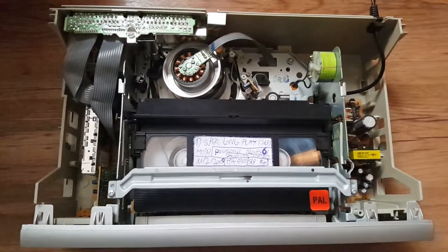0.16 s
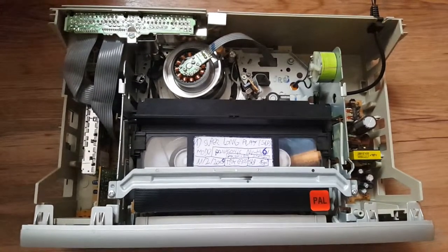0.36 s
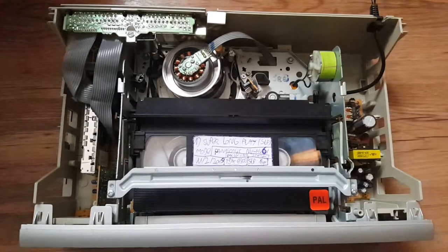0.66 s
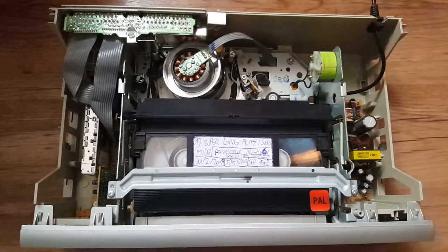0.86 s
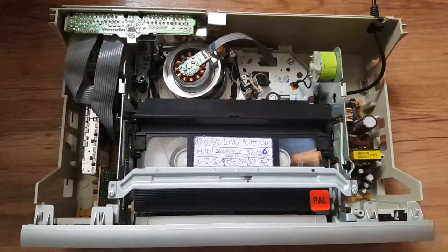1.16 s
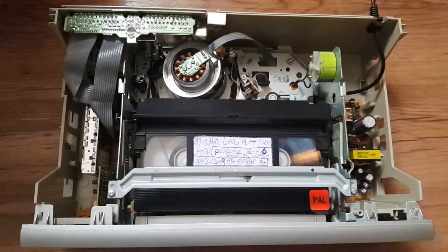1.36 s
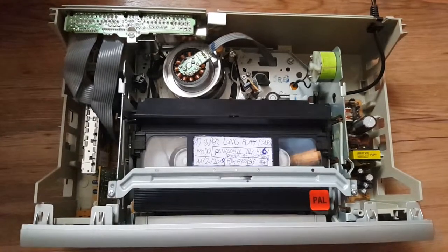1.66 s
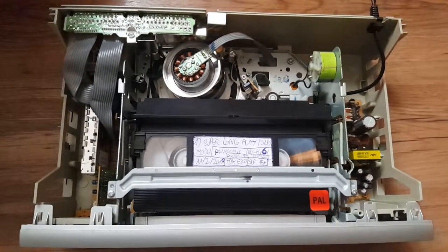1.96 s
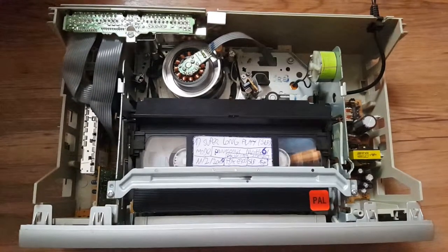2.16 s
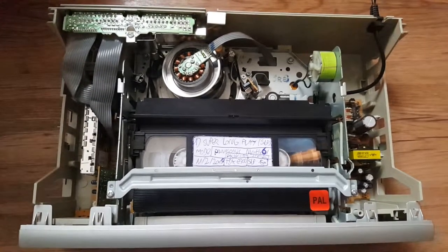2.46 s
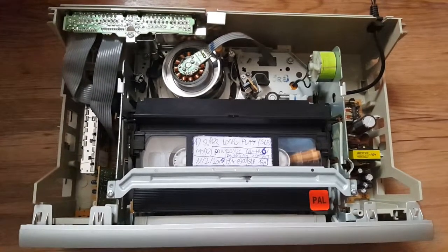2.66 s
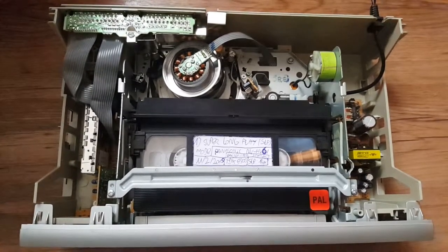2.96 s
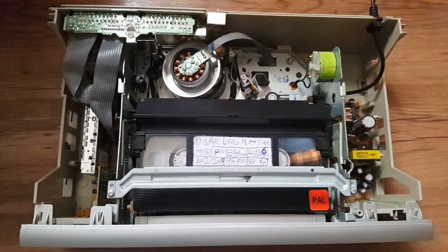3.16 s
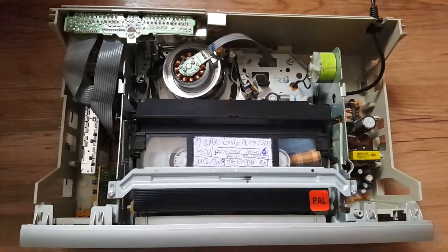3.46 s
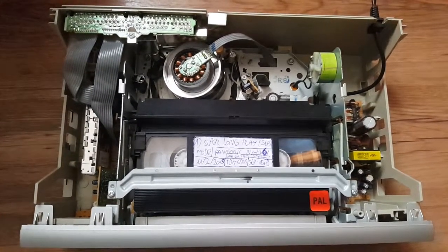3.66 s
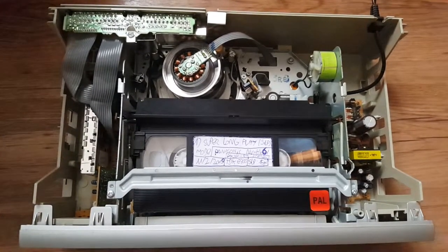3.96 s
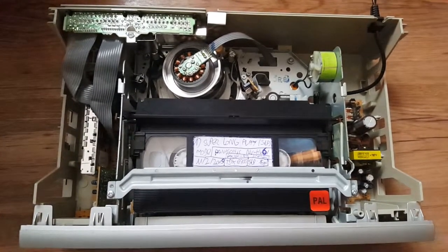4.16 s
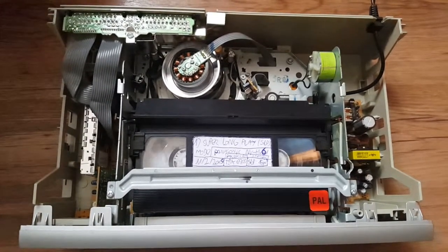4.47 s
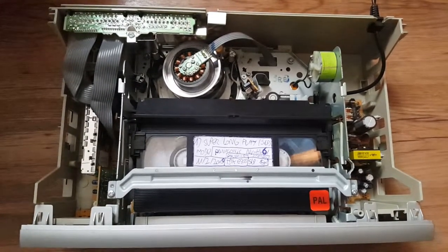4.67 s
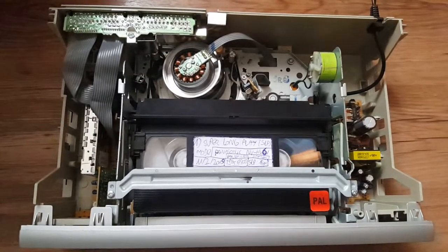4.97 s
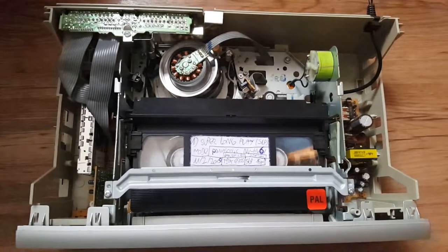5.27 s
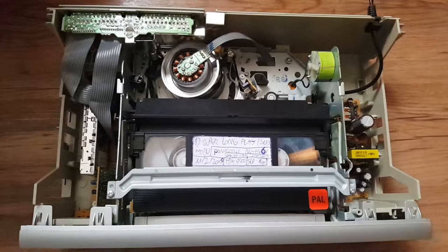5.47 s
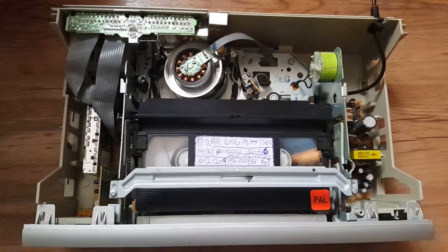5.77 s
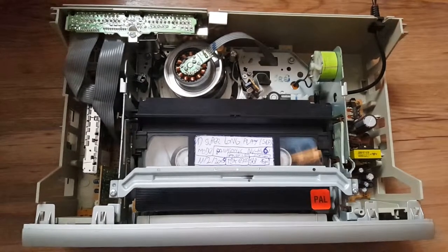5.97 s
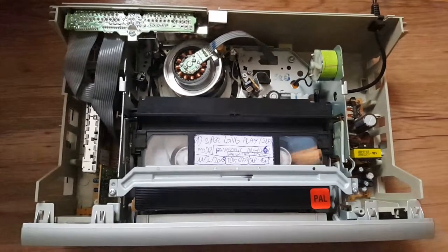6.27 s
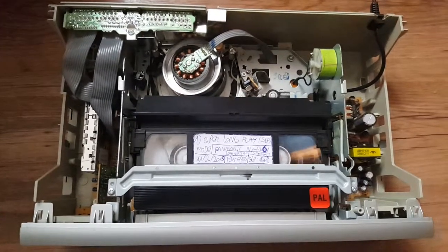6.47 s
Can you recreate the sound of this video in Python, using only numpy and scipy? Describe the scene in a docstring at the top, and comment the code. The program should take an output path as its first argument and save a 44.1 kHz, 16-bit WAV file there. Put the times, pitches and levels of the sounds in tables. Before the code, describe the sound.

An open video cassette recorder winds a tape at speed, gears rattling and whining slightly downward while the reels give brief high chirps. It brakes with a cluster of plastic and metal clacks, leaving a faint hum. A small motor whirs in short runs, a lever snaps over, and the tape winds on with a quieter, fluttering purr and light scrapes. Heard close up in a quiet room.

```python
"""A whining, chattering rush of tape: an open video recorder on a wooden table winds a cassette fast.
Reel flanges chirp against the shell, the gears run down and the brakes bite with a few clicks.
The small loading motor shifts the mechanism in short runs, a lever snaps over, and the tape winds on
slowly with a purr. Head drum and mains transformer hum throughout. Rattle, scrapes and clatter all
ring through the same chassis."""
import sys
import numpy as np
from scipy import signal
from scipy.fft import rfft, irfft
from scipy.io import wavfile
from scipy.ndimage import uniform_filter1d

SR = 44100
rng = np.random.default_rng(int(sys.argv[2]) if len(sys.argv) > 2 else 0)


def put_to_file(sound):
    """Save the sound as 16-bit audio at rate SR, in the file named by the first command-line argument."""
    columns = np.atleast_2d(sound).T  # one column per channel
    safe = np.clip(columns, -1, 1)
    whole_steps = np.round(safe * 32767)
    wavfile.write(sys.argv[1], SR, whole_steps.astype(np.int16))


N = 292065
T, HZ = np.arange(N) / SR, np.fft.rfftfreq(N, 1 / SR)

# resonances of deck plate and case (frequency [Hz], width [Hz], lift [dB])
CHASSIS_MODES = [(125.4, 10.6, 8), (234, 28, 8), (326, 49, 11.5), (402, 53, 8.5), (478, 36, -3),
                 (531, 84, 14), (583, 25, -2.5), (642.3, 120, 16), (711, 16.4, 9.5), (757, 27, 8),
                 (830, 30, -2.5), (867, 16, 9.5), (920, 137, 6.5), (1060, 590, 2.5), (1307, 26, 1.5),
                 (1470, 150, 4), (1817, 200, 5), (2273, 290, 3), (2646, 82, 3.5), (3015, 140, 6.5),
                 (3270, 60, 3.5), (5200, 2230, 7), (6000, 64, 1), (7870, 650, 7)]
# narrow wheel resonances that the whine slides through (frequency [Hz], width [Hz], lift [dB])
WHEEL_MODES = [(330, 7.3, -0.5), (527, 4.9, -1.5), (701, 49, 4.5), (895, 9.5, 9.5), (918, 18, 2.5),
               (1067, 71, 8), (1153, 15, 11)]
# gear whine (pitch [x mesh rate], blur [Hz], early level [dB], late level [dB], beating twin [dB])
WHINE_TONES = [(.635, 4, -21.5, -13.5, -8), (1, 3, -14, -10.5, -9), (1.265, 9, -16, -18, -8),
               (1.63, 5, -18, -19, -6), (2, 2, -20.5, -14.5, -4), (2.48, 3, -19, -18.5, -6),
               (2.7, 6, -20, -22, -6), (3, 4, -23, -20.5, -6)]
# regular pulses in the reels' rubbing hiss, one slow and two faster
# (rate [Hz], first peak [s], depth [nepers])
RUB_PULSES = [(5.9, .162, .18), (13.06, .059, .45), (26.6, .01, .5)]
# strongest lines of drum motor and transformer (frequency [Hz], level [dB])
HUM_LINES = [(1001, -75), (1050, -75), (1104, -63.8), (1211, -73), (1249, -68), (1297, -71), (1324, -64),
             (1416, -70), (1432, -66), (1502, -73), (1588, -75), (1620, -73), (1653, -64), (1685, -70),
             (1760, -74), (1857, -68), (1873, -69), (2051, -80), (2202, -76), (2250, -79), (2299, -73),
             (2401, -72), (3020, -83), (3106, -81), (3429, -86), (3650, -79)]
# shifts in the hum's colour (time [s], gain up to 1.1 kHz [dB], gain from 1.8 kHz up [dB])
HUM_SHIFTS = [(2.55, 2.5, -6), (2.78, 4, 0.5), (2.95, -1.5, 2), (3.28, 2.5, 1.5), (3.55, -2.5, 1),
              (4.2, -0.5, -1), (4.5, 2.5, -1)]
# a flange touches the cassette shell (time [s], level [dB], length [s])
SCRAPES = [(0.165, -43, 0.012), (0.343, -42, 0.015), (0.425, -44, 0.013), (0.983, -44, 0.0074),
           (1.533, -43, .009), (1.758, -43.5, 0.011), (1.925, -51, 0.012), (2.049, -42, 0.011),
           (2.271, -52.5, 0.012), (4.528, -51.5, 0.035), (4.581, -52, 0.0073), (4.888, -53.5, 0.08),
           (5.006, -53, 0.026), (5.155, -59, 0.025), (5.358, -61.5, 0.022), (5.42, -61, 0.021),
           (5.506, -56, 0.034), (5.63, -62, .02), (5.685, -60, 0.026), (5.837, -57, 0.046),
           (5.912, -55.5, 0.024), (6.053, -56, 0.041), (6.277, -56.5, 0.03), (6.36, -56.5, 0.023),
           (6.42, -59, 0.049), (6.597, -60, .02)]
# loading motor runs (start [s], stop [s], coasting [s], gear level [dB], brush level [dB])
LOADING_RUNS = [(2.094, 2.145, 0.07, -60, -50), (3.705, 4.069, 0.021, -59.5, -66),
                (4.268, 4.389, 0.031, -59.5, -65)]
# blows of brakes, pawls and levers; the last five columns are relative to the level
# (time [s], level [dB], clatter decay [s], knock [dB], bass [dB], clang [dB], treble [dB], snap [dB])
BLOWS = [(2.153, -35.5, 0.051, -12, 7.5, -4, -24, -30), (2.183, -44, .05, -8, -19, -6, -20, -14),
         (2.269, -39, 0.11, -14, -3, -31, -17, -29), (2.322, -43, .07, -10, 7, -12, -25, -21),
         (2.333, -35, 0.087, -14, -18, -15, -16, -29), (2.3497, -32, 0.058, -2, -7, -4, 1.5, -9),
         (2.38, -46, .02, -1, -4, -12, -12, -20), (2.448, -42, 0.14, -20, -21, -32, -30, -35),
         (2.466, -41.5, 0.039, -3, -20, 1, -19, -30), (2.472, -40.5, .025, -4, -20, -4.5, -22, -35),
         (2.511, -60, .04, -12, -15, -6, 6, -20), (2.517, -42.5, .025, -2, -1, -18, -13, -30),
         (3.714, -58, .067, -14, 6, -22, -22, -30), (3.759, -45, .067, -14, 0, -20, -22, -30),
         (3.879, -37, .04, -10, -10, -18, -25, -30), (4.6068, -39.5, .05, -12, -20, -11, -1, 7),
         (4.608, -30.5, 0.034, -3, -4.5, -18, -8, -16), (4.659, -54.5, .05, -8, -22, -22, 5, -29),
         (4.682, -57, .05, -8, -14, -19, 9, -28)]
# ring of a struck lever (frequency [Hz], level [dB], time to fall 60 dB [s])
LEVER_MODES = [(870, -7, .012), (1400, -8, .003), (1739, -17, .05), (2300, -9, .002), (3070, -11, .06),
               (3375, -19, .06), (3935, -16, .053), (4620, -19, .05), (5700, -12, .003), (7230, -21, .05)]
# the lever bounces (delay [s], level [dB])
REBOUNDS = [(.003, -4), (.0045, -8), (.008, -11)]
# gear tones of the slow drive (frequency [Hz], blur [Hz], level [dB])
PURR_TONES = [(125.5, 2, -21.5), (203, 4, -21), (251, 5, -16.5), (381, 7, -12.5), (522, 18, -11.5),
              (650, 7, -14), (755, 9, -16), (877, 7, -11.5), (1890, 5, -9), (2210, 8, -19), (2620, 2.5, -9),
              (3050, 8, -18), (3290, 4.5, -23)]

# tone colour of each source (frequency [Hz], relative level [dB])
FAST_RATTLE_EQ = [(30, -19), (60, -33), (110, -17.5), (180, -15), (300, -9), (600, -14.5), (1000, -2),
                  (1700, -0.5), (2400, -6.5), (3600, -13), (4500, -13), (5400, -17.5), (6500, -17.5),
                  (8500, -15), (10500, -26), (13500, -21.5), (15500, -32)]
FLANGE_EQ = [(30, -70), (3000, -45), (4600, 0), (5000, 10.5), (5300, 19), (5550, 12), (5900, 13.5),
             (6700, -4), (7900, 10), (9500, 0.5), (16000, -11)]
DRUM_EQ = [(180, -57), (300, -46), (568, -22), (680, -24), (828, -13.5), (1080, -23), (1290, -23),
           (1520, -5.5), (1880, -14), (1970, -15.5), (2320, -5.5), (2690, -16), (3730, -13.5),
           (5710, -29.5), (6600, -34), (7400, -23), (10000, -41), (15000, -41)]
TRANSFORMER_EQ = [(180, -50), (500, -30), (650, 8), (900, -32), (1500, 5), (1950, -8), (2330, -11),
                  (2600, -10), (3100, -1), (3350, -17), (3680, -3), (4200, -29), (4650, -3.5), (5050, -17),
                  (6300, -17), (7500, -14.5), (15000, -15.5)]
LOADING_GEAR_EQ = [(30, -19), (100, 3.5), (350, 5), (550, -7.5), (850, 4.5), (1250, 6.5), (1750, 10.5),
                   (2400, -1), (3600, -16), (7000, -39), (15000, -35)]
BRUSH_EQ = [(30, -50), (3000, -4.5), (4700, -9.5), (5300, -11.5), (6900, -9), (7700, -2.5), (8250, -8),
            (8650, 3.5), (8950, -4), (9900, -13), (11400, -7), (13300, -4), (13550, -3), (13950, -14),
            (16000, -12)]
SLOW_RATTLE_EQ = [(30, -53), (90, -19), (180, -1.5), (300, -4), (600, -9), (1000, 0.5), (1700, 1),
                  (2400, -1.5), (3600, -9.5), (6500, -17.5), (8500, -13.5), (10500, -20.5), (13500, -14),
                  (15500, -21)]
PULLEY_EQ = [(30, -64), (1200, -33), (1700, -13), (1880, 1), (2100, 2), (2630, -2), (2820, -6), (3050, 2),
             (3350, -15), (3800, -31), (16000, -40)]
ROOM_EQ = [(20, -18), (40, -8), (58, 5), (100, -5.5), (300, -9), (600, -10), (1200, -3), (3000, -37),
           (6000, -23), (15000, -38)]
CLATTER_EQ = [(30, -23), (300, 8.5), (1000, 6.5), (2300, 3), (4500, -3), (5400, -8.5), (8000, -7),
              (12000, -16), (16000, -13)]

# how alike the two microphone ports sound (frequency [Hz], correlation [-1 to 1])
PORT_LIKENESS = [(60, 0.6), (150, 0.9), (640, 0.78), (1400, 0.9), (3000, -0.13), (15000, 0.5)]
# how far the left port leads (frequency [Hz], phase [rad])
PORT_LEAD = [(100, .05), (700, 0.031), (950, 0.74), (1200, 1), (1500, 0.81), (1900, 0.83), (5000, 1.2),
             (9000, 2.4), (12000, 1.8), (15500, 8.2)]
# balance of the ports (frequency [Hz], left minus right [dB])
PORT_BALANCE = [(60, 1.5), (200, -1), (380, 3.5), (730, -2.5), (900, 2.5), (1080, -2), (1550, 3),
                (1850, 2.5), (2450, -1), (5100, -0.3), (8000, 0), (9200, 5), (11000, 2.5), (15000, 2.5)]

DRUM_HZ, MAINS_HZ = 18.37, 50


def gain_of(db):
    """Decibels as a gain."""
    return 10 ** (np.asarray(db) / 20)


def unit_rms(x):
    """Scales to unit rms."""
    return x / np.sqrt(np.mean(x ** 2) + 1e-20)


def curve(points, hz=HZ):
    """Joins a table's points along a log-frequency axis."""
    f, value = np.transpose(points)
    return np.interp(np.log(hz + 1), np.log(f + 1), value)


def lift(resonances):
    """Gain in dB of a set of resonances."""
    return sum(db / (1 + (2 * (HZ - hz) / width) ** 2) for hz, width, db in resonances)


def since(s):
    """Seconds gone by since s, zero before."""
    return np.maximum(T - s, 0)


def ramp(s, length_s):
    """Fades from 0 to 1, starting at s."""
    return np.minimum(since(s) / length_s, 1)


def wander(rate_hz):
    """Smooth random motion of unit rms, up to about rate_hz."""
    return unit_rms(irfft(rfft(rng.standard_normal(N)) * np.exp(-(HZ / rate_hz) ** 2), N))


def phase(hz):
    """Running angle of something turning at hz."""
    return 2 * np.pi * (np.cumsum(hz * np.ones(N)) / SR + rng.random())


def stereo_noise(pair, eq_db):
    """Colours two unrelated signals and blends them into what the two ports hear, at unit rms."""
    left, other = rfft(pair)
    likeness = np.clip(curve(PORT_LIKENESS), -1, 1)
    right = (likeness * left + np.sqrt(1 - likeness ** 2) * other) * np.exp(-1j * curve(PORT_LEAD))
    return unit_rms(irfft(np.array([left, right]) * gain_of(eq_db), N))


def stereo_tone(x, eq_db=0):
    """Colours one clear signal, which reaches the two ports out of step."""
    return irfft(rfft(x) * gain_of(eq_db) * np.exp(np.array([[.5j], [-.5j]]) * curve(PORT_LEAD)), N)


def hiss(eq_db, pressure=1):
    """Coloured friction noise that follows the contact pressure."""
    return stereo_noise(rng.standard_normal((2, N)) * pressure, eq_db)


def gear_tone(hz, blur_hz, flutter=.22):
    """A meshing tone whose uneven teeth blur its pitch and shake its level."""
    blur = .65 * wander(2 * blur_hz)
    return unit_rms(np.cos(phase(hz) + blur) * (1 + flutter * wander(4 * blur_hz)))


def chassis(grain_db=.8):
    """Body EQ in dB of deck plate and case: big resonances among countless small ones."""
    grain = uniform_filter1d(rng.standard_normal(len(HZ)), size=400)
    small_modes = unit_rms(uniform_filter1d(grain, size=300))
    crowding = np.clip(HZ / 2500, 0, 1)  # the small modes crowd in the treble
    return grain_db * crowding * small_modes + lift(CHASSIS_MODES)


def gear_whine(mesh_hz, teeth_per_pulley_turn=30.5):
    """Each gear tone beats with a twin one pulley rate below it and rings through the wheels."""
    whine = np.zeros(N)
    for multiple, blur_hz, early_db, late_db, twin_db in WHINE_TONES:
        level = gain_of(np.interp(T, [.47, 1.46], [early_db, late_db]))  # shifts as the load grows
        tone = gear_tone(multiple * mesh_hz, blur_hz)
        twin = gear_tone((multiple - 1 / teeth_per_pulley_turn) * mesh_hz, blur_hz)
        whine += level * (tone + gain_of(twin_db) * twin)
    return stereo_tone(whine, lift(WHEEL_MODES))


def fast_wind(body, start_hz=584, end_hz=508, sag_s=1.6, cut_s=2.05, run_down_s=.17, brake_s=2.138):
    """Gears chatter and whine, tape rushes and flanges rub until the motor cuts and the brake grips."""
    driven_hz = end_hz + (start_hz - end_hz) * np.exp(-T / sag_s)  # sags as the tape pack grows
    run_down = np.exp(-(since(cut_s) / run_down_s) ** 2)
    chatter = np.exp(.039 * wander(370) + .08 * wander(21))
    rattle = gain_of(-.4) * hiss(curve(FAST_RATTLE_EQ) + body, chatter)
    pulses = sum(depth * np.cos(2 * np.pi * hz * (T - first_s)) for hz, first_s, depth in RUB_PULSES)
    flange = gain_of(-15.3) * hiss(curve(FLANGE_EQ) + body, np.exp(pulses + .22 * wander(110)))
    whine = gain_of(1.2) * run_down ** 1.4 * gear_whine(driven_hz * np.maximum(run_down, .1))
    level = gain_of(-35 - 192 * since(brake_s))  # the brake takes off 192 dB a second
    return level * (rattle + flange + whine)


def buzz(cycle_hz, eq_db):
    """The same roughness comes round every cycle and makes a comb of lines."""
    cycle = rng.standard_normal((2, round(SR / cycle_hz)))
    return stereo_noise(cycle[:, np.arange(N) % cycle.shape[1]], eq_db)


def head_drum(bearing_db=-67, whirr_db=-64):
    """The spinning drum whirrs over the soft hiss of its bearing."""
    colour = curve(DRUM_EQ)
    return gain_of(bearing_db) * hiss(colour) + gain_of(whirr_db) * buzz(DRUM_HZ, colour)


def transformer(level_db=-66):
    """The transformer buzzes at multiples of the mains rate."""
    return gain_of(level_db) * buzz(MAINS_HZ, curve(TRANSFORMER_EQ))


def hum_lines(trim_db=-.8, swell_depth=.24, waver_depth=.17):
    """The strongest lines of drum motor and transformer sing out, swelling slowly and wavering fast."""
    drift = 1 + .00028 * wander(7.6)
    wobble = .14 * np.cos(phase(DRUM_HZ))  # the drum runs slightly out of true
    times, low_db, high_db = np.transpose(HUM_SHIFTS)
    low, high = gain_of(np.interp(T, times, low_db)), gain_of(np.interp(T, times, high_db))
    out = np.zeros((2, N))
    for hz, db in HUM_LINES:
        colour = low + np.interp(hz, [1100, 1800], [0, 1]) * (high - low)
        swell = 1 + swell_depth * np.cos(phase(rng.uniform(1, 3.5)))
        angle = phase(hz * drift)
        side = (-curve(PORT_LEAD, hz) / 2 + .4 * rng.standard_normal()) * np.sin(angle)
        line = np.sqrt(2) * (np.cos(angle) + np.array([side, -side]))  # out of step at the ports
        waver = 1 + waver_depth * wander(15) + wobble
        out += gain_of(db + trim_db) * colour * swell * waver * line
    return out


def flange_scrapes(body, slip_hz=107, slip_depth=.45, grain=.2):
    """Now and then a flange touches the shell, sticking and slipping in a short chirp."""
    touch_power = sum(gain_of(2 * db) * .5 ** np.minimum((2 * (T - s) / length_s) ** 2, 100)
                      for s, db, length_s in SCRAPES)
    slips = np.cos(phase(slip_hz * (1 + .1314 * wander(21.1))))
    pressure = np.exp(slip_depth * slips + grain * wander(150))
    return np.sqrt(touch_power) * hiss(curve(FLANGE_EQ) + body, pressure)


def loading_motor(body, spin_up_s=.049, worm_start_hz=1692, rise_hz_per_s=140, worm_db=-55.3):
    """A brush motor turns the cam by a worm gear: gears rattle at once, brushes hiss only at speed."""
    gears = gain_of(7.5) * hiss(curve(LOADING_GEAR_EQ) + body, np.exp(.22 * wander(150)))
    brushes = gain_of(9.5) * hiss(curve(BRUSH_EQ) + .47 * body, np.exp(.12 * wander(500)))
    out = np.zeros((2, N))
    for start, stop, coast_s, gear_db, brush_db in LOADING_RUNS:
        speed = (1 - np.exp(-since(start) / spin_up_s)) * np.exp(-since(stop) / coast_s)
        out += gain_of(gear_db) * speed ** .47 * gears
        out += gain_of(brush_db) * speed ** 1.45 * brushes
        loaded = start + .15  # the worm sings once the cam has taken up the load
        if loaded < stop:
            worm_hz = worm_start_hz + rise_hz_per_s * np.minimum(since(loaded), stop - loaded)
            worm = gear_tone(worm_hz, blur_hz=2.2)
            wheel = gain_of(-10) * gear_tone(.52 * worm_hz, blur_hz=8.3)
            out += gain_of(worm_db) * speed * ramp(loaded, .041) * (worm + wheel)
    return out


def lever_clicks(body, clatter_db=-8, attack_s=.00068, snap_speed=3.3, tail_db=-20, tail_t60=.5):
    """A hard knock rebounds, then plastic and steel clatter and die fast, with a faint room tail."""
    colour = curve(CLATTER_EQ) + body
    edges_hz = (60, 1000, 2800, 5000, 9500, 18000)  # bass, mid, clang, treble, snap
    bands = [hiss(colour - 10 * np.log10(1 + (lo / (HZ + 1)) ** 12 + (HZ / hi) ** 16))
             for lo, hi in zip(edges_hz, edges_hz[1:])]
    speeds = (1, 1, 1, np.sqrt(snap_speed), snap_speed)  # the top bands rise and die faster
    clatter, knocks = np.zeros((2, N)), np.zeros(N)
    for s, db, decay_s, knock_db, bass, clang, treble, snap in BLOWS:
        at = slice(round(s * SR), round(s * SR) + SR // 2)
        age = T[at] - T[at][0]
        shares_db = (bass + 3, 0, clang + 5, treble + 3, snap + 5)
        for band, share_db, speed in zip(bands, shares_db, speeds):
            t = speed * age
            attack = 1 - np.exp(-t / attack_s)
            decay = gain_of(-60 * t / decay_s) + gain_of(tail_db - 60 * t / tail_t60)
            clatter[:, at] += gain_of(db + clatter_db + share_db) * attack * decay * band[:, at]
        for hz, mode_db, t60 in LEVER_MODES:
            strike_db = db + knock_db + mode_db + shares_db[np.searchsorted(edges_hz, hz) - 1]
            knocks[at] += gain_of(strike_db - 60 * age / t60) * np.cos(2 * np.pi * hz * age)
    rebounds = sum(gain_of(db) * np.roll(knocks, round(delay_s * SR)) for delay_s, db in REBOUNDS)
    return clatter + stereo_tone(knocks + rebounds)


def slow_drive_envelope(jolt_s=4.53, attack_s=.024, decay_s=.13, start_s=4.662, growth_db_per_s=.44):
    """A jolt as the idler gear engages, then the reel gathers speed and slowly grows louder."""
    jolt = np.exp(-(np.minimum(T - jolt_s, 0) / attack_s) ** 2 - since(jolt_s) / decay_s)
    steady = ramp(start_s, .2) * gain_of(-50 + growth_db_per_s * since(start_s))
    return gain_of(-51.5) * jolt + steady


def slow_wind(body, reel_turn_s=.373, wow_depth=.008, swish_depth=.92):
    """Gears purr, wavering each reel turn; the pulley swishes once a turn and chops the high tones."""
    colour = curve(SLOW_RATTLE_EQ) + body
    rattle = gain_of(2.5) * hiss(colour, np.exp(.11 * wander(210)))
    pulley_hz = np.interp(T, [5.08, 5.27], [43.7, 46.3])
    wow = 1 + wow_depth * np.cos(2 * np.pi * (T - 5.48) / reel_turn_s)
    swish = unit_rms(1 + swish_depth * np.cos(phase(pulley_hz * wow)))
    pulley = gain_of(-11) * hiss(curve(PULLEY_EQ) + body, swish)
    purr = np.zeros(N)
    for hz, blur_hz, db in PURR_TONES:
        chop = swish ** min((hz / 1800) ** 1.9, 1)
        purr += gain_of(db) * gear_tone(hz * wow, blur_hz) * chop
    drive = slow_drive_envelope() * (rattle + ramp(4.8, .28) * (pulley + stereo_tone(purr)))
    # one gear sings out while the reel gathers speed
    rising_hz = np.interp(T, [4.75, 4.95, 5.2], [1760, 1845, 1885])
    spin_up = gain_of(-53.5) * np.exp(-((T - 5.04) / .19) ** 2) * gear_tone(rising_hz, 4.3) * swish
    # the low rattle swells briefly near the end
    low_rattle = hiss(colour - 10 * np.log10(1 + (HZ / 910) ** 8))
    swell = gain_of(-48) * np.exp(-((T - 6.49) / .076) ** 2) * low_rattle
    return drive + spin_up + swell


def scene(room_db=-64.5):
    """The moving parts share one chassis, over a bed of hum and room tone."""
    body = chassis()
    drives = fast_wind(body) + loading_motor(body) + slow_wind(body)
    contacts = flange_scrapes(body) + lever_clicks(body)
    hum = head_drum() + transformer() + hum_lines()
    return drives + contacts + hum + gain_of(room_db) * hiss(curve(ROOM_EQ))


def record(dry, high_cut_hz=15850):
    """Each microphone port adds its own colour, and a steep high cut takes off the very top."""
    heard = irfft(rfft(dry) * gain_of(np.array([[.5], [-.5]]) * curve(PORT_BALANCE)), N)
    high_cut = signal.firwin(511, high_cut_hz, window=("kaiser", 9), fs=SR)
    return signal.oaconvolve(heard, high_cut[None], "same")


dry = scene()
out = record(dry)
put_to_file(out)
```